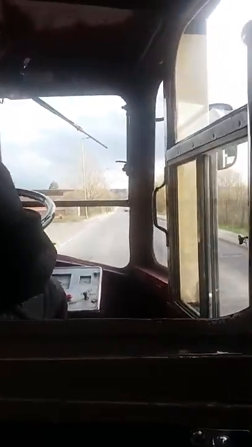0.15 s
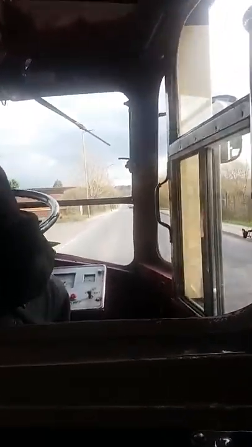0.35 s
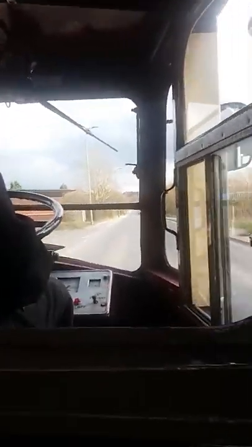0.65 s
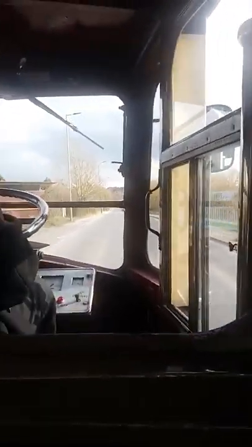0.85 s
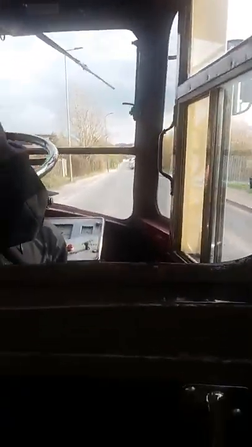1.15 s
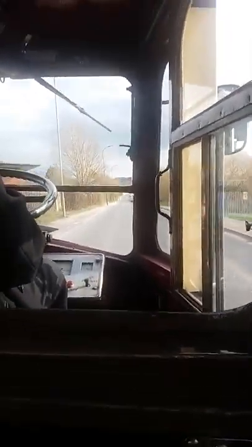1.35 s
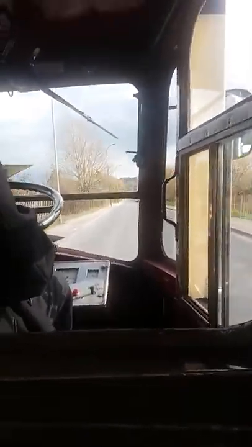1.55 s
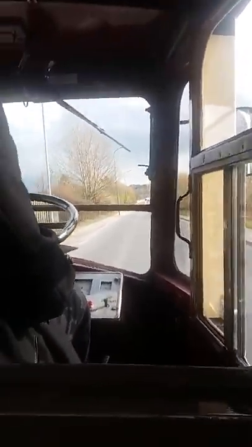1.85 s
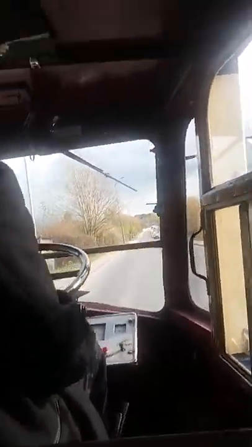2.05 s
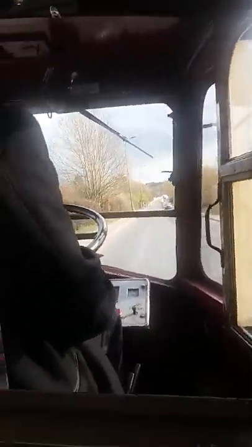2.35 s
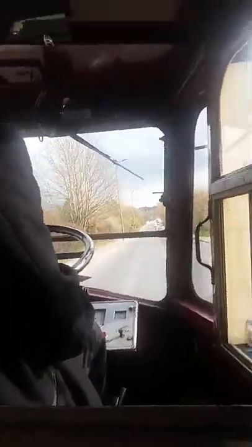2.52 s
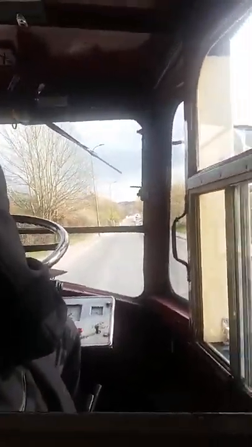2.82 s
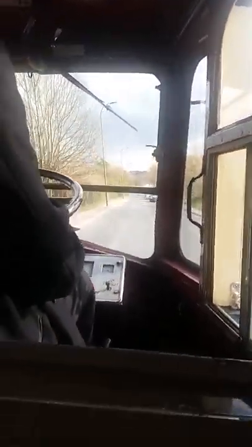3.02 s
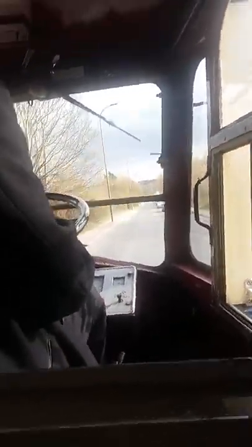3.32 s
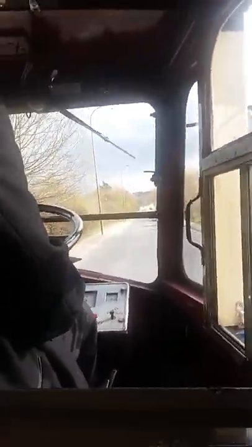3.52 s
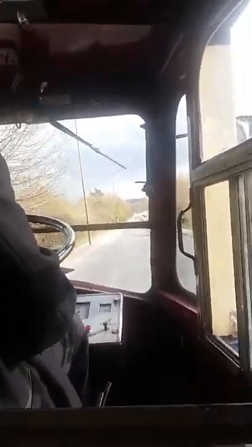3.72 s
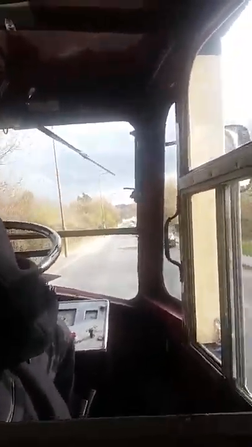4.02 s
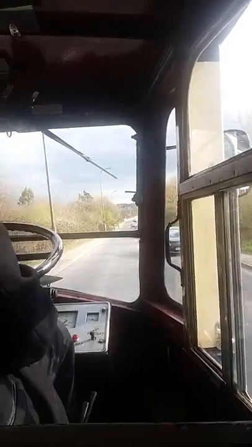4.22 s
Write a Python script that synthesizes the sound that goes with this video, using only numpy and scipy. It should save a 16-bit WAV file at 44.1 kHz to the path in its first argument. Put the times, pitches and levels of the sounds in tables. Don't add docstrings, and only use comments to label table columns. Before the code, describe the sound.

The cabin of an old bus in motion, heard close behind the driver on a phone microphone. A six-cylinder diesel runs throughout, a deep uneven boom with fast metallic knocking and raspy clatter, its pitch rising only slightly over about 4.4 seconds. Tyre rumble lies beneath; thin gear and floor-plate whines waver above, with a light hiss of draught and trim. A loose fitting buzzes brightly, strongest around 0.7 s, while window frames tick in quick irregular taps during the first second, then thin out. Jolts overload the microphone: a few thumping dropouts from 0.5 to 0.95 s, a dense stuttering flutter of about twenty gaps a second from 1.2 to 1.7 s, and one at 2.3 s. The engine pulls harder around 1.9 to 2.5 s, road noise eases until 3.7 s, then the choppy flutter returns from 3.8 to 4.15 s and the ride roughens.

```python
import sys
import numpy as np
from scipy import signal
from scipy.fft import rfft, irfft
from scipy.io import wavfile
from scipy.ndimage import uniform_filter1d

SR = 44100
rng = np.random.default_rng(int(sys.argv[2]) if len(sys.argv) > 2 else 0)


def attenuation_scalar(level_db):
    decades = np.asarray(level_db, float) / 20
    return 10 ** decades


def int16_out(signal):
    q = np.round(np.clip(np.atleast_2d(signal).T, -1, 1) * 32767)
    wavfile.write(sys.argv[1], SR, q.astype(np.int16))


N = 193025
TIME = np.arange(N) / SR


def level(x, db):
    return x * attenuation_scalar(db) / np.sqrt(np.mean(x ** 2))


def walk(rate_hz):
    hold = int(SR / rate_hz)
    steps = np.repeat(rng.standard_normal(N // hold + 1), hold)
    return 1.07 * uniform_filter1d(uniform_filter1d(steps, hold), hold)[:N]


def colour(x, spectrum):
    hz, db = np.transpose(spectrum)
    size = 8192
    log_hz = np.log(np.fft.rfftfreq(size, 1 / SR) + 1)
    gain_db = np.interp(log_hz, np.log(hz), db, left=db[0] - 36.5)
    cepstrum = irfft(gain_db * np.log(10) / 20)
    cepstrum[1:size // 2] *= 2
    cepstrum[size // 2 + 1:] = 0
    return signal.fftconvolve(x, irfft(np.exp(rfft(cepstrum))))[:N]


def ring(x, modes):
    return sum(attenuation_scalar(db) * signal.lfilter(*signal.iirpeak(hz, hz / width, SR), x) for hz, width, db in modes)


def ring_twice(x, hz, width_hz):
    return ring(ring(x, [(hz, width_hz, 0)]), [(hz, width_hz, 0)])


def blows(turns, places, db, scatter_db, slop_ms):
    cycle = np.arange(int(turns[-1]) + 1)[:, None]
    late, strong = rng.standard_normal((2, len(cycle), len(places)))
    at = np.interp(cycle + places, turns, np.arange(N)) + slop_ms * SR / 1000 * late
    at = np.clip(at, 0, N - 2).ravel()
    size = (attenuation_scalar(db + scatter_db * strong) * (cycle + places < turns[-1])).ravel()
    whole = at.astype(int)
    part = at - whole
    return np.bincount(whole, size * (1 - part), N) + np.bincount(whole + 1, size * part, N)


def tones(turns, orders, waver_db, waver_turns):
    out = np.zeros(N)
    for order, db in orders:
        phase = order * turns + rng.random() + waver_turns * walk(9.6)
        out += attenuation_scalar(db + waver_db * walk(4.71)) * np.sin(2 * np.pi * phase)
    return out


# start_s, cycle_hz
ENGINE_SPEED = [
    (0, 15.7),
    (1.1, 15.8),
    (1.9, 16.0),
    (2.6, 16.22),
    (3.36, 16.4),
    (4.38, 16.62),
]


def engine_turns():
    return np.cumsum(np.interp(TIME, *np.transpose(ENGINE_SPEED))) / SR


# start_s, load_db, roughness_db
DRIVE = [
    (0, -1.5, 1.5),
    (.55, -4, 1.5),
    (.95, 1.5, 1),
    (1.4, 1.5, 3.5),
    (1.9, 4.5, 0.5),
    (2.5, 4, 0),
    (3.1, 0, -1),
    (3.7, -1, -2),
    (4.1, 1, 1.5),
    (4.38, -3.5, 1.5),
]


def driven(base_db, per_load, per_roughness):
    start_s, load_db, roughness_db = np.transpose(DRIVE)
    load = np.interp(TIME, start_s, load_db)
    roughness = np.interp(TIME, start_s, roughness_db)
    return base_db + per_load * load + per_roughness * roughness


# cycle_multiple, level_db
BOOM_ORDERS = [(2, -30), (3, -2), (4, -9), (5, -12), (6, -1.5), (7, -12), (8, -4), (9, -13), (10, -12),
               (11, -12), (12, -3), (13, -20), (14, -4.5), (15, -17), (16, -24)]


def boom(turns):
    return level(tones(turns, BOOM_ORDERS, waver_db=1.5, waver_turns=.025), -15)


# pitch_hz, level_db per Hz
ROAD_SPECTRUM = [(21, -32), (35, -7), (75, -5.5), (108, -2), (225, -7.5), (280, -15), (371, -10.5),
                 (420, -45), (550, -26), (920, -120)]


def road():
    return attenuation_scalar(1.4 * walk(5.44)) * level(colour(rng.standard_normal(N), ROAD_SPECTRUM), -17.5)


CYLINDERS_DB = [
    -25,
    -16.5,
    -28.5,
    -17.5,
    -19.5,
    -20.5,
]
# pitch_hz, level_db per Hz
CABIN = [(150, -45), (260, -7), (400, -5), (600, -2.5), (900, 0), (1200, -1), (1900, -3), (2050, -9),
         (3000, -14.5), (4300, -27.5), (5000, -35), (8000, -40), (11000, -47.5), (16000, -56.5)]
# pitch_hz, width_hz, level_db
PANELS = [(490, 70, -1), (632, 14, 2), (680, 16, 0), (715, 18, -1), (815, 60, 1), (885, 20, -1),
          (1050, 70, -3), (1180, 40, -2), (1335, 30, 2), (1434, 12, 5), (1500, 20, 2), (1600, 50, 0)]
# pitch_hz, width_hz, level_db
BLOCK = [(1675, 30, 6.5), (1785, 35, 5), (1845, 16, 3), (1882, 18, 6), (2137, 60, 2), (2266, 16, 3)]


def knock(turns, block_db, panel_db):
    firing = blows(turns, np.arange(6) / 6, np.array(CYLINDERS_DB), scatter_db=-4.0, slop_ms=0.19)
    valve_gear = blows(turns, rng.random(40), 4.0 * rng.standard_normal(40), scatter_db=2.5, slop_ms=.03)
    puff = signal.lfilter([1], [1, -np.exp(-1 / (0.051 * SR))], firing)
    rasp = (puff + 2.1 * puff.mean()) * rng.standard_normal(N)
    shake = level(firing, -15) + level(valve_gear, -2) + level(rasp, -2)
    broad = level(colour(shake, CABIN), -17.5)
    near = blows(turns, np.arange(3) / 3 + .1, np.array([1.5, -4, -2.5]), scatter_db=1.0, slop_ms=0.35)
    clack = level(ring_twice(near, 1870, 560), -28.5)
    return broad + attenuation_scalar(panel_db) * ring(broad, PANELS) + attenuation_scalar(block_db) * (ring(broad, BLOCK) + clack)


# cycle_multiple, level_db
GEARS = [
    (24, 0),
    (36, -5),
    (42, -6),
    (60, -6),
]


def gear_whine(turns):
    return level(tones(turns, GEARS, waver_db=1.8, waver_turns=.035), -28)


# cycle_multiple, plate_hz, width_hz, level_db (rms at the centre)
PLATES = [(28, 460, 16, -29), (39, 631, 15, -25), (44, 716, 18, -29), (51, 842, 34, -23.5),
          (51, 800, 12, -24.5), (52, 838, 20, -27), (53, 840, 20, -24), (66.3, 1085, 24, -28)]


def plates(turns):
    out = np.zeros(N)
    for order, hz, width, db in PLATES:
        line = tones(turns, [(order, db + 3)], waver_db=1.5, waver_turns=.04)
        out += ring(ring(line, [(hz, width, 0)]), [(hz, 2 * width, 0)])
    return out


def hiss(db):
    grains = rng.standard_normal(N) * attenuation_scalar(2.6 * walk(150) + 1.2 * walk(12))
    treble = signal.butter(2, 5000, "high", fs=SR, output="sos")
    return attenuation_scalar(db) * level(signal.sosfilt(treble, colour(grains, CABIN)), -39.5)


def buzz(db):
    chatter = rng.standard_normal(N) * attenuation_scalar(1.24 * walk(60))
    centre_s, half_s, spell_db = .68, 0.2, 2.5
    db = db + spell_db * np.exp(-((TIME - centre_s) / half_s) ** 4)
    band = ring(ring(chatter, [(4065, 1140, 0)]), [(3880, 1570, 0)])
    return attenuation_scalar(db) * level(band, -40.0)


# start_s, level_db (the peak is 3 dB higher)
TICKS = [(0.0333, -29), (0.0444, -28), (0.0667, -29), (0.0794, -29), (0.167, -30), (0.1955, -25),
         (0.3344, -36), (0.4359, -27), (0.4618, -31), (0.5474, -29), (0.5931, -24), (0.631, -24),
         (0.711, -26), (0.7352, -26), (0.7564, -26), (0.784, -28), (0.8659, -32), (0.8944, -35),
         (1.084, -29), (1.2111, -29), (1.5948, -23), (1.694, -25.5), (1.7534, -30), (1.8043, -36),
         (3.053, -34), (3.1194, -33), (3.5603, -33), (3.7294, -33), (4.3256, -30), (4.3394, -29)]


def ticks():
    length = 1024
    out = np.zeros(N + length)
    decay = np.exp(-np.arange(length) / SR / .004)
    for start_s, db in TICKS:
        hz = 7740 + 110 * (db + 29) + 410 * rng.standard_normal()
        tap = ring_twice(rng.standard_normal(length), hz, 4500) * decay
        start = int(start_s * SR)
        out[start:start + length] += attenuation_scalar(db + 3) * tap / np.abs(tap).max()
    return out[:N]


def scene():
    turns = engine_turns()
    whine_db = driven(-0.72, 0.041, 0.078)
    rumble = attenuation_scalar(driven(0.46, -0.039, 0.53)) * (boom(turns) + road())
    clatter = attenuation_scalar(driven(0.28, -0.16, 0.35)) * knock(turns, block_db=driven(.5, 1, 0), panel_db=whine_db)
    whine = attenuation_scalar(whine_db) * gear_whine(turns) + plates(turns)
    trim = hiss(driven(9.6, 0.091, 1)) + buzz(driven(5, -.6, 0.2)) + ticks()
    return (rumble + clatter + whine + trim)[None]


# start_s, length_ms, swing_speed (full scales a second, signed by direction)
JOLTS = [(0.4764, 4.6, -399), (0.5601, 8.6, -579), (0.6075, 17.3, 491), (0.6645, 6.2, 338),
         (0.9402, 8.4, -467), (1.2334, 16.5, -409), (1.2878, 16.3, 407), (1.3281, 12.3, -342),
         (1.3757, 22.0, 537), (1.4142, 11.9, -622), (1.4618, 23.7, 590), (1.5021, 26.1, -467),
         (1.5553, 30.2, 584), (1.6083, 29.6, -545), (1.6639, 27.4, 450), (1.7191, 23.1, -400),
         (2.2844, 12.9, 379), (3.8325, 10.2, -307), (3.8849, 16.5, 416), (3.9246, 18.3, 377),
         (3.9751, 24.2, 345), (4.022, 18.0, -414), (4.0772, 25.1, 399), (4.1408, 5.2, 473)]


def overload(x):
    cut = np.zeros_like(x)
    for start_s, length_ms, speed in JOLTS:
        since = TIME - start_s
        side = np.sign(speed)
        past_rail = 1.1 * abs(speed) * since * (1 - since * 1000 / length_ms) + .5
        cut += side * np.maximum(past_rail + side * x, 0)
    return x - cut


def band_limit(x):
    return signal.sosfilt(signal.butter(12, 16510, fs=SR, output="sos"), x)


def record(dry):
    bass_cut = signal.butter(6, 65, "high", fs=SR, output="sos")
    top_cut = signal.ellip(8, .2, 36, 15750, fs=SR, output="sos")
    drive_gain, ceiling = .82, 1.15
    thin = signal.sosfilt(bass_cut, overload(dry))
    soft = ceiling * np.tanh(drive_gain * thin / ceiling)
    mix = signal.sosfilt(top_cut, soft)
    return band_limit(mix)


dry = scene()
out = record(dry)
int16_out(out)
```